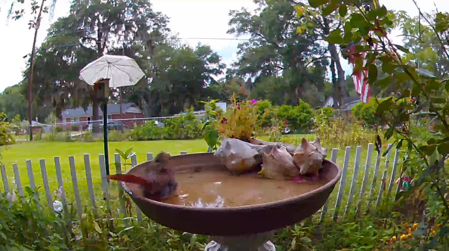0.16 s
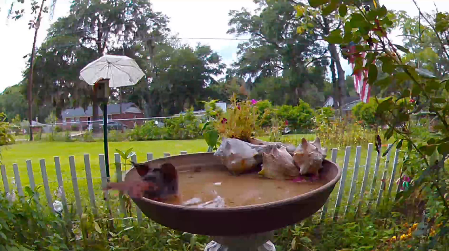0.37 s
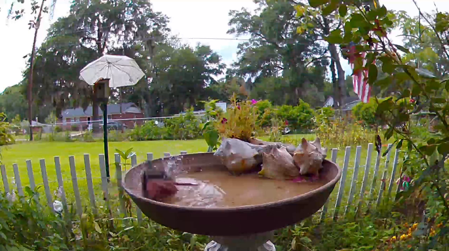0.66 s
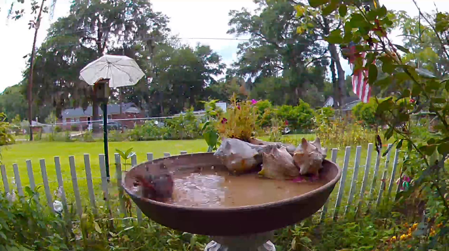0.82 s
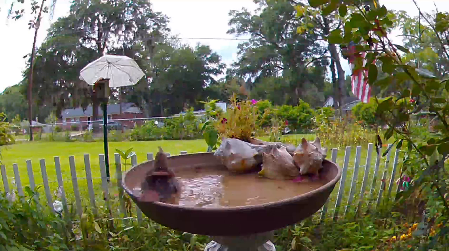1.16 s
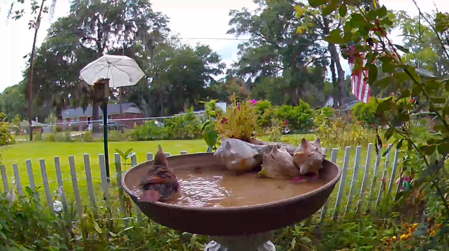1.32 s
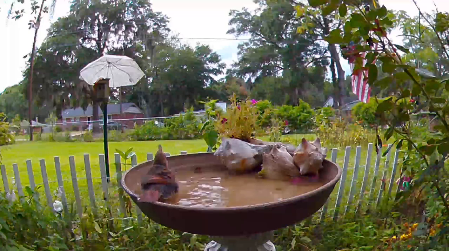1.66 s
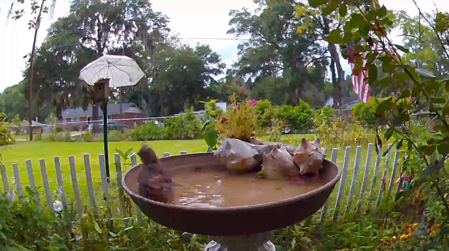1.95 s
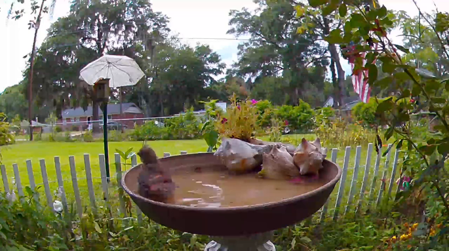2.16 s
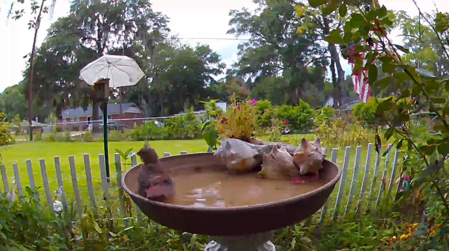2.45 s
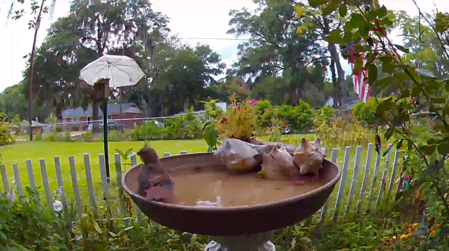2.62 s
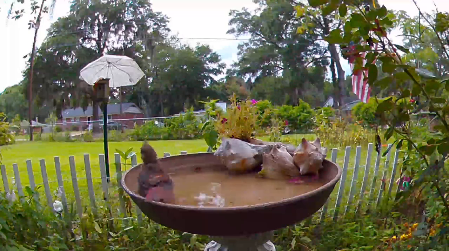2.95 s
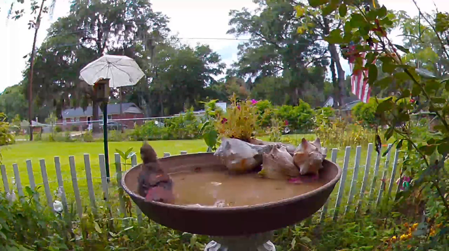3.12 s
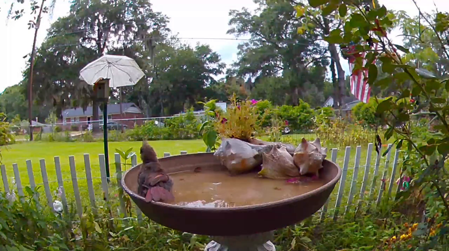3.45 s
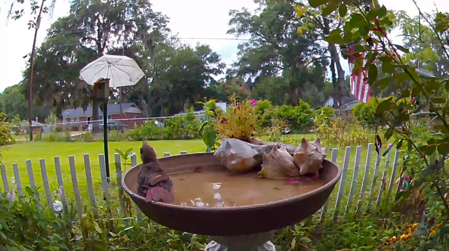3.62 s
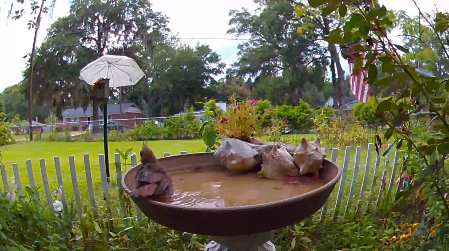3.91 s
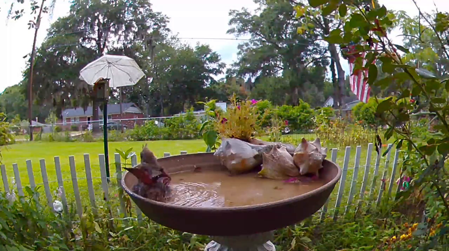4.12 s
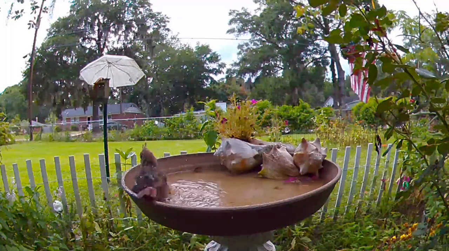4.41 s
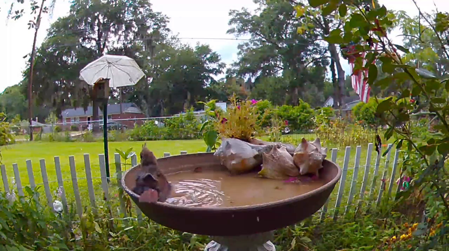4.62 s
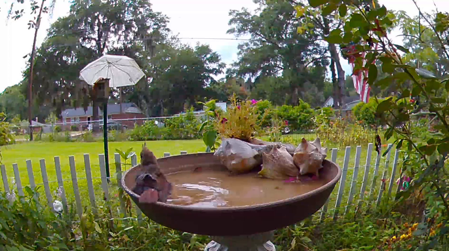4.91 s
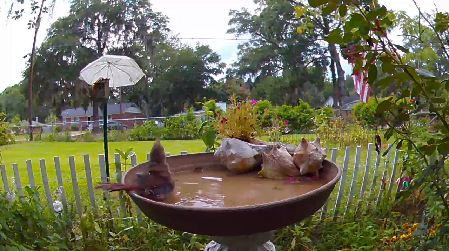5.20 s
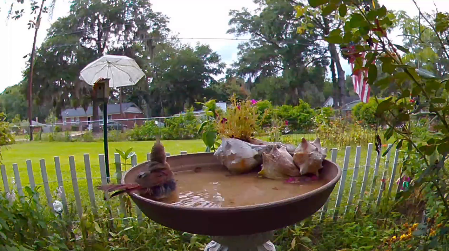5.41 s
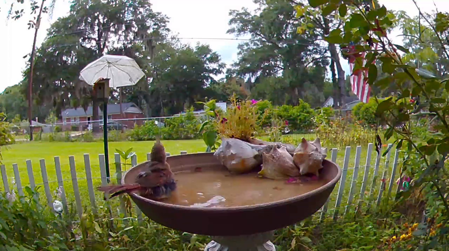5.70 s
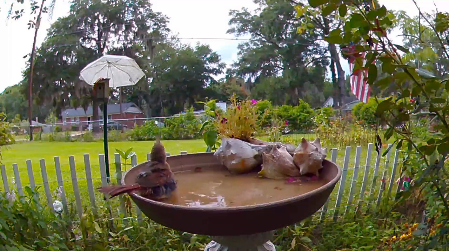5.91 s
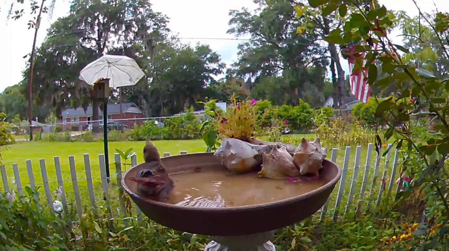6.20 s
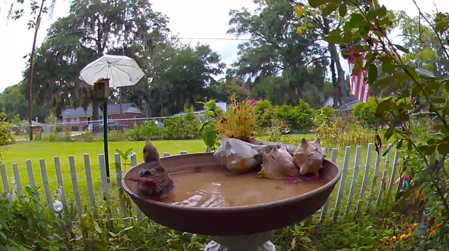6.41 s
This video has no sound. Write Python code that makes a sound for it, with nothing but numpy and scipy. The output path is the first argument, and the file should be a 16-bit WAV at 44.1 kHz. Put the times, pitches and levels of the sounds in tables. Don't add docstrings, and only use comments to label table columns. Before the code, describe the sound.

Faint high insect hiss and a low pulsing hum lie under a bird bathing nearby. Wings patter on water in a fast burst near the start and again past the middle, with fine droplets and bubble plinks. Each burst is followed by a single tiny, piercing chip, distorted with buzz by the small microphone. A distant bird whistles barely audibly; the outdoor echoes are short and leafy.

```python
import sys
import numpy as np
from scipy import signal
from scipy.fft import rfft, irfft
from scipy.io import wavfile

SR = 44100
rng = np.random.default_rng(int(sys.argv[2]) if len(sys.argv) > 2 else 0)


def amplitude_ratio(level_db):
    exponent = np.asarray(level_db, float) / 20
    return 10 ** exponent


def unload_wav(signal):
    wavfile.write(
        sys.argv[1],
        SR,
        np.round(np.clip(np.atleast_2d(signal).T, -1, 1) * 32767).astype(np.int16),
    )


N = 289296
TIME = np.arange(N) / SR


def shaped(white, points):
    hz, level_db = np.transpose(points)
    bins_hz = np.arange(N // 2 + 1) * SR / N
    gain = amplitude_ratio(np.interp(np.log(bins_hz + 1), np.log(hz), level_db))
    x = irfft(rfft(white) * gain, N)
    return x / np.std(x)


def resonance(x, hz, width):
    r = np.exp(-np.pi * width / SR)
    poles = [1, -2 * r * np.cos(2 * np.pi * hz / SR), r * r]
    return signal.lfilter([(1 - r * r) / 2, 0, (r * r - 1) / 2], poles, x)


def band(x, low_hz, high_hz):
    return signal.sosfilt(signal.butter(2, [low_hz, high_hz], "band", fs=SR, output="sos"), x)


def drift(rate):
    knots = rng.standard_normal(2000)
    return np.interp(TIME * rate, np.arange(2000), knots)


def whistle(rows):
    s, hz, level_db = np.transpose(rows)[:3]
    phase = 2 * np.pi * np.cumsum(np.interp(TIME, s, hz)) / SR
    return amplitude_ratio(np.interp(TIME, s, level_db + 3, left=-200, right=-200)) * np.sin(phase)


def high_insects():
    # (time [s], level [dB])
    vigour = [(0.0, -61), (0.86, -63), (1.3, -63.5), (1.72, -60), (1.9, -63), (2.32, -64.5), (2.72, -61),
              (6.56, -62.5)]
    # (frequency [Hz], density [dB per Hz])
    spectrum = [(5000, -34), (6400, -20), (6830, -9), (7000, -11), (7200, -7), (7600, -4), (8000, -2),
                (8400, -11), (8800, -18), (9200, -60)]
    pulses_per_s, trains_per_s = 250, 62
    chorus = shaped(rng.standard_normal(N), spectrum) * amplitude_ratio(1.8 * drift(70))

    pulse_count = np.floor(np.cumsum(pulses_per_s * amplitude_ratio(2.5 * drift(60))) / SR)
    pulses = np.diff(pulse_count, prepend=0) * rng.choice([-1, 1], N)
    train_turns = np.cumsum(trains_per_s * amplitude_ratio(2.5 * drift(30))) / SR
    trains = np.sin(2 * np.pi * train_turns) + .5 * drift(45)
    train_db = 8 * np.tanh(2.5 * trains) + 1.5 * drift(25)
    callers = resonance(pulses * amplitude_ratio(train_db) + 1e-18, 7990, 250)
    callers = resonance(callers, 7990, 600)

    level_db = np.interp(TIME, *np.transpose(vigour))
    return amplitude_ratio(level_db - 3) * (chorus + callers / np.std(callers))


def low_insects():
    # (centre [s], half length [s], level [dB])
    calls = [(0.493, 0.16, -62.5), (2.372, 0.37, -61), (4.12, 0.15, -67), (6.1, 0.29, -70)]
    rest_db = -73.5
    swell = amplitude_ratio(rest_db) + sum(amplitude_ratio(db) * np.exp(-((TIME - s) / half) ** 2) for s, half, db in calls)
    tone = resonance(resonance(rng.standard_normal(N), 4050, 610), 4050, 610)
    return tone / np.std(tone) * swell * amplitude_ratio(-9 + drift(23))


def motor_hum():
    # (frequency [Hz], width of wander [Hz], level [dB])
    tones = [(58.5, 5, 2.5), (112.5, 29, -21), (160, 3.6, -18)]
    level_db, beat_s, null_s, beat_depth = -65, 1.88, 1.92, .58
    beat = np.abs(1 - beat_depth * np.exp(2j * np.pi * (TIME - null_s) / beat_s))
    wobble = np.cumsum(drift(7.0)) / SR
    hum = 0
    for hz, width, tone_db in tones:
        hum = hum + amplitude_ratio(tone_db) * np.sin(2 * np.pi * (hz * TIME + .4 * width * wobble))
    return hum * beat * amplitude_ratio(level_db + drift(2.8))


def hush():
    # (frequency [Hz], density [dB per Hz])
    spectrum = [(15, -30.5), (25, -16), (65, -4), (82, -9), (108, -10.5), (398, -24), (515, -23),
                (1690, -27.5), (2030, -20.5), (2390, -26), (4180, -22), (5520, -30.5), (6500, -28),
                (8450, -51.5), (14300, -120)]
    return amplitude_ratio(-65 + 0.39 * drift(4.8)) * shaped(rng.standard_normal(N), spectrum)


def far_bird():
    # (start [s], length [s], first pitch [Hz], last pitch [Hz], peak [dB])
    calls = [(.262, .058, 4250, 3350, -65), (.90, .035, 4280, 4180, -64), (6.025, .035, 3800, 3400, -69),
             (6.04, .2, 4350, 4230, -71)]
    peak_share, in_db, out_db = .4, -8, -9
    song = 0
    for s, length, first_hz, last_hz, db in calls:
        peak_hz = first_hz + peak_share * (last_hz - first_hz)
        song = song + whistle([(s, first_hz, db + in_db),
                               (s + peak_share * length, peak_hz, db),
                               (s + length, last_hz, db + out_db)])
    return song * (1 + 2.5 * band(rng.standard_normal(N), 29.4, 300))


def port(x):
    # (frequency [Hz], width [Hz], lift [dB])
    cavity = [(1950, 350, 7), (3000, 500, 4), (4050, 700, 6), (7600, 1300, 10)]
    return x + sum((amplitude_ratio(level_db) - 1) * resonance(x, hz, width) for hz, width, level_db in cavity)


def wing_contacts():
    # (time [s], peak [dB], brightness [dB], length [s])
    full = [(0.262, -53, 8, .009), (0.316, -31, -1.5, 0.012), (.3684, -30.5, -2, 0.0081),
            (0.428, -41, 0, 0.019), (0.471, -41.5, 0, 0.013), (0.492, -49, -3, 0.014),
            (4.72, -49.5, -4, 0.012), (0.583, -48.5, -1, .013), (0.6456, -30.5, 4.5, .009),
            (0.679, -45, -0.5, 0.017), (0.735, -51, -9, 0.012), (.789, -39.5, -1.5, 0.022),
            (.843, -42.5, 2, .01), (.8966, -41.5, 0.5, 0.017), (0.956, -48, -5, 0.011),
            (3.645, -48, -2, .009), (3.801, -49, -3, 0.0077), (3.855, -47, -2, 0.014),
            (3.906, -41, 4, .011), (3.953, -44.5, 0, 0.017), (3.9927, -44.5, -1, 0.015),
            (4.046, -42, -2, 0.013), (4.1, -44, 1, 0.017), (4.152, -42.5, 3.5, .012),
            (4.201, -44.5, 0, 0.014), (4.252, -40, 0, .011), (4.314, -46, -4, 0.016),
            (4.4434, -56.5, -11.5, .02), (4.652, -45, -7, 0.0043), (5.846, -46, 1.5, 0.02)]
    # (time [s], peak [dB])
    touches = [(.377, -47), (.417, -52), (.634, -53), (0.689, -52), (.776, -45), (1.014, -47), (3.842, -46),
               (3.944, -51), (4.039, -45), (4.0914, -51), (4.141, -50), (4.1924, -43), (4.228, -50),
               (4.609, -49), (6.0634, -58)]
    middle_db, tip_bright_db, tip_length_s = -4, 2, 0.0054
    tips = [(s, db, tip_bright_db, tip_length_s) for s, db in touches]
    return [(s, db - bright_db, db + middle_db, db + bright_db, length)
            for s, db, bright_db, length in [*full, *tips]]


def slaps():
    bands_hz = [(700, 4400), (2400, 4420), (5600, 7540)]
    out, t = np.zeros(N + SR), np.arange(-.008, .05, 1 / SR)
    for s, low_db, mid_db, high_db, length in wing_contacts():
        grit_db = 3.5 * np.minimum(rng.exponential(1, len(t)), 3) - 10
        grit = rng.standard_normal(len(t)) * amplitude_ratio(grit_db)
        swell = amplitude_ratio(-3 + 2800 * t)
        decay = amplitude_ratio(-40 * t / length) + 0.057 * amplitude_ratio(-8 * t / length)
        burst = grit * np.where(t < 0, swell, decay)
        burst[np.searchsorted(t, 0)] += 3.0
        i = int((s + t[0]) * SR)
        for (low_hz, high_hz), level_db in zip(bands_hz, (low_db, mid_db, high_db)):
            part = port(band(burst, low_hz, high_hz))
            out[i:i + len(t)] += amplitude_ratio(level_db) * part / np.abs(part).max()
    return out[:N]


def spray():
    # (full at [s], level [dB], fade [dB per s], flurry ends [s])
    flurries = [
        (.32, -63.5, 16, 1.1),
        (3.79, -72.5, -4, 4.2),
    ]
    rise_db_per_s, fall_db_per_s, drops_per_s = 198, 27, 1500
    level = 0
    for s, db, fade_db, end in flurries:
        rise = rise_db_per_s * np.maximum(s - TIME, 0)
        fade = fade_db * np.maximum(TIME - s, 0)
        fall = fall_db_per_s * np.maximum(TIME - end, 0)
        level = level + amplitude_ratio(db - rise - fade - fall)

    sizes = amplitude_ratio(3.0 * np.minimum(rng.exponential(1, N), 4))
    clicks = (rng.random(N) < drops_per_s / SR) * sizes * rng.choice([-1, 1], N)
    dealt = rng.integers(0, 12, size=N)
    rings = sum(resonance(clicks * (dealt == k) + 1e-18, hz, hz * 0.39)
                for k, hz in enumerate(np.geomspace(1500, 8000, 12)))
    return amplitude_ratio(2.5) * level * rings / np.std(rings)


def drops():
    # (time [s], peak [dB], pitch [Hz], t60 [s])
    plinks = [(0.3847, -51, 4000, 0.021), (0.415, -56, 2220, 0.024), (0.434, -45, 4160, 0.017),
              (0.4567, -44.5, 3580, 0.015), (0.4698, -42.5, 2080, 0.011), (0.669, -50.5, 3280, 0.0085),
              (1.0365, -51.5, 1940, 0.013), (4.4428, -54.5, 2180, 0.014), (4.6479, -46, 2330, 0.0092),
              (4.7158, -49.5, 2360, 0.0094), (6.0636, -58.5, 3620, 0.014), (4.6495, -50, 3450, 0.011),
              (5.005, -57, 4000, 0.012)]
    out, t = np.zeros(N + SR), TIME[:SR // 16]
    for s, peak_db, hz, t60 in plinks:
        envelope = amplitude_ratio(peak_db + 14 - 60 * t / t60) * np.clip(t / 0.00085, 0, 1)
        i = int(s * SR)
        out[i:i + len(t)] += envelope * np.sin(2 * np.pi * hz * t * (1 + 2.7 * t))
    return out[:N]


def chip_rows(s, peak_db, length, release, deepest):
    depths = (.25, .9, .6)
    start_hz, top_hz, glide_s = 5200, 8300, .0072
    attack_s, sag_db_per_s, release_db, swell_s = .0056, 620, 22, .0055
    t = np.linspace(0, length + release, num=60)
    hz = top_hz - (top_hz - start_hz) * np.exp(-t / glide_s)
    rise_db = 17 * np.log10(np.clip(t / attack_s, .01, 1))
    sag_db = sag_db_per_s * np.clip(t - attack_s - release / 2, 0, None)
    fall_db = sag_db + release_db * np.clip((t - length) / release, 0, 1) ** 2
    depth = np.interp(t - deepest, [-swell_s, 0, swell_s], depths)
    return np.transpose([s + t, hz, peak_db + rise_db - fall_db, depth])


def chips():
    # (start [s], peak [dB], length [s], release [s], deepest throb after [s])
    calls = [
        (1.5297, -18, .0128, .0014, .006),
        (4.9643, -14.3, .012, .009, .0135),
    ]
    # (rate [Hz], one crest [s])
    throbs = [
        (400, 1.5352),
        (400, 4.9741),
    ]
    out = 0
    for chip, (rate_hz, crest) in zip(calls, throbs):
        rows = chip_rows(*chip)
        second_half = np.interp(TIME, rows[:, 0], rows[:, 3])
        beat = np.abs(1 + second_half * np.exp(2j * np.pi * rate_hz * (TIME - crest)))
        out = out + whistle(rows) * beat
    upper = band(np.abs(out) * rng.standard_normal(N), 8400, 9300)
    return out * (1 + .2 * band(rng.standard_normal(N), 1000, 2000)) + 1.44 * upper


def garden(x):
    # (level [dB], t60 [s])
    tails = [(-12, 0.06), (-28.5, 0.19), (-42, 0.55)]
    # (delay [s], level [dB])
    echoes = [(.0035, -21), (.0105, -20), (.0128, -17), (.017, -26), (.022, -25)]
    t = TIME[:SR // 2]
    response = np.zeros(len(t))
    for level_db, t60 in tails:
        decay = amplitude_ratio(level_db - 19.5 - 60 * t / t60)
        response += decay * rng.standard_normal(len(t)) * np.clip(t / 0.0057, 0, 1)
    for delay, level_db in echoes:
        response[int(delay * SR)] += amplitude_ratio(level_db)
    return x + signal.fftconvolve(x, response)[:N]


def scene():
    background = high_insects() + low_insects() + motor_hum() + hush()
    far = far_bird()
    water = slaps() + amplitude_ratio(1.5) * port(spray()) + amplitude_ratio(-0.5) * drops()
    in_garden = garden(chips() + far + 0.41 * water)
    return (in_garden + 0.27 * water + background)[None]


def low_pass(x):
    return signal.sosfilt(signal.butter(12, 9250, fs=SR, output="sos"), x)


def record(dry):
    threshold, softness = .115, .15
    over = np.maximum(-resonance(dry, 7800, 2000) - threshold, 0)
    excess = softness * np.tanh(over / softness)
    crackle = band(excess * rng.standard_normal(N), 500, 4500)
    buzz = 1.56 * band(excess, 70, 1000) + 0.12 * crackle
    top = signal.cheby2(10, 55, 9900, fs=SR, output="sos")
    mix = signal.sosfilt(top, signal.sosfilt(top, dry + buzz))
    return low_pass(mix)


dry = scene()
out = record(dry)
unload_wav(out)
```